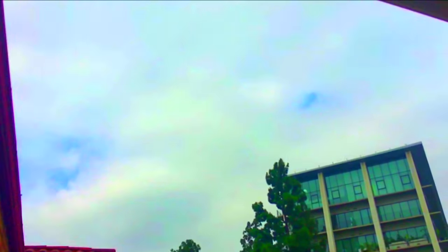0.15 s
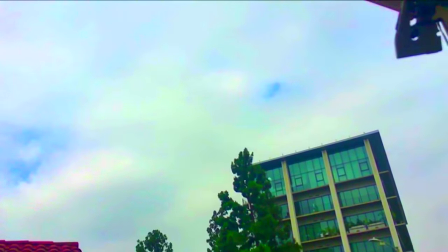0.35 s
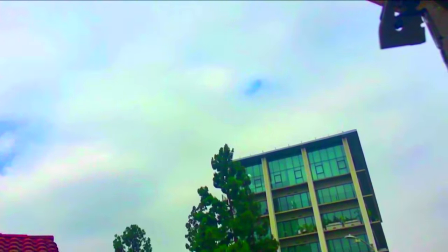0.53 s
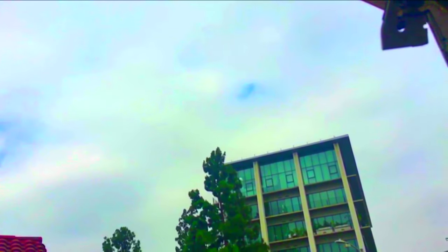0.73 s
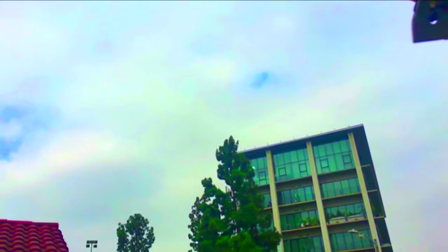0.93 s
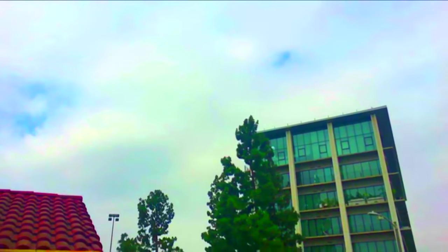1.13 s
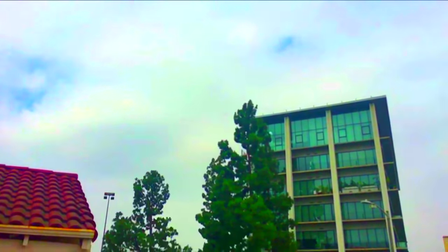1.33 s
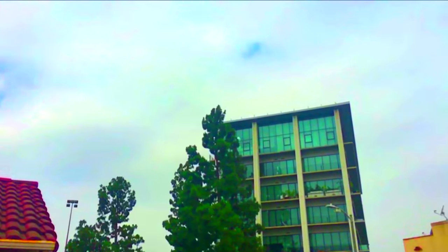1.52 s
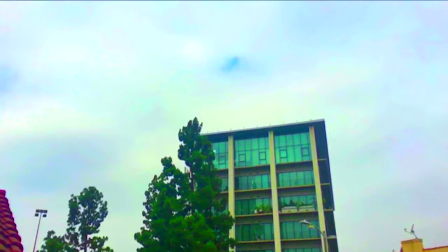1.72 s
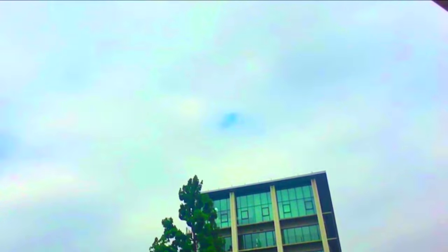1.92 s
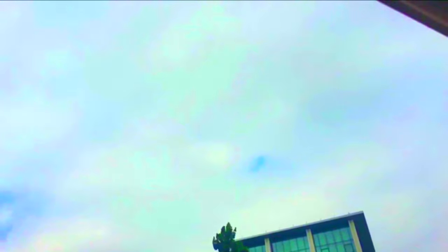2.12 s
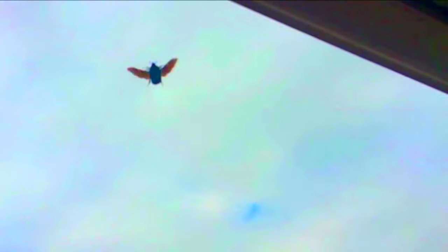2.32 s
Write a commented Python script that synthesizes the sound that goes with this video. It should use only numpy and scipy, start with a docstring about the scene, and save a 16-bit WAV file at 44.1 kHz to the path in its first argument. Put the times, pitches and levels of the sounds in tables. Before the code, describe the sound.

Low, fluttering drone of a big beetle flying closer, with a distant engine and bird behind.

```python
"""A town square fades in: low rumble, and a distant engine droning on one slowly sinking note.
A small click sounds close by at the start. A large beetle flies up to the microphone, each wing
stroke giving a low thrum and a puff of hiss. Behind it a bird whistles two trills, smeared by
wall echoes. The level keeps rising to the end, and the peaks lean on a limiter."""
import sys
import numpy as np
from scipy import signal
from scipy.fft import rfft, irfft
from scipy.io import wavfile
from scipy.ndimage import uniform_filter1d, minimum_filter1d

SR = 44100
rng = np.random.default_rng(int(sys.argv[2]) if len(sys.argv) > 2 else 0)


def transcribe(signal):
    """Save signal, clipped to [-1, 1], as a 16-bit WAV file at the path in sys.argv[1]."""
    frames = np.atleast_2d(signal).T
    limited = np.clip(frames, -1, 1)
    pcm = np.round(limited * 32767).astype(np.int16)
    wavfile.write(sys.argv[1], SR, pcm)


N = 104076


def gain_of(db):
    """Decibels to gain."""
    return 10 ** (np.asarray(db) / 20)


def unit_rms(x):
    """Scales a signal to rms 1."""
    return x / np.sqrt(np.mean(x ** 2) + 1e-20)


def curves(table):
    """Turns a table with time_s first into one per-sample curve for each further column."""
    times, *columns = np.transpose(table)
    return [np.interp(np.arange(N) / SR, times, column) for column in columns]


def equalise(x, eq):
    """Filters by (frequency_hz, gain_db) points joined on a log-frequency axis."""
    points_hz, points_db = np.transpose(eq)
    hz = np.fft.rfftfreq(x.shape[-1], 1 / SR)
    gain_db = np.interp(np.log(hz + 1), np.log(points_hz + 1), points_db)
    return irfft(rfft(x) * gain_of(gain_db), x.shape[-1])


def drift(seconds):
    """Random drift of rms 1 that changes over the given time."""
    size = max(int(seconds * SR), 2)
    return unit_rms(uniform_filter1d(uniform_filter1d(rng.standard_normal(N), size), size))


def wavering_harmonics(phase, harmonics, waver_db, waver_s):
    """Sines at multiples of one phase, each drifting in level on its own."""
    return sum(gain_of(db + waver_db * drift(waver_s)) * np.sin(k * phase + 2 * np.pi * rng.random())
               for k, db in harmonics)


def spread(mid, twin):
    """Left and right from a centre signal and an unrelated twin that widens the upper mids."""
    # tone of the side signal: frequency_hz, gain_db
    side_eq = [(150, -66), (330, -26), (770, -24), (1050, -17), (1500, -3), (2100, 1), (2950, -2),
               (3150, -32), (15000, -24)]
    # the image widening and narrowing: time_s, gain_db
    side_ride = [(.49, -39), (.53, -12.5), (.91, -13), (.94, 3), (1.03, -13.5), (1.42, -8), (1.47, 1),
                 (1.56, 0), (1.7, -5.5), (1.9, -5), (1.96, 6), (2.14, 2), (2.19, -3.5), (2.36, -11.5)]
    side = equalise(twin, side_eq) * gain_of(curves(side_ride)[0])
    return np.array([mid + side, mid - side])


def town_rumble():
    """The town's bed of noise: a swelling deep rumble under a patchy, faintly flickering wash."""
    # tone of the bed: frequency_hz, gain_db
    town_eq = [(20, -40), (35, -3.5), (48, -2.5), (70, 2.5), (98, 3), (125, -16), (200, -14), (300, -20),
               (500, -24.5), (1000, -26), (1800, -31), (2500, -37.5), (3600, -40), (4500, -47),
               (9500, -51.5), (10200, -55), (15700, -55.5)]
    # swell of the deep rumble: time_s, gain_db
    swells = [(0, 1), (.5, 0.5), (.75, 3), (1.0, -3), (1.25, 3), (1.5, -1.5), (1.7, -4), (1.95, 0.4),
              (2.15, -4), (2.36, -1.7)]
    level_db, patch_db, flicker_db, rumble_top_hz = -10.5, 1.5, 0.14, 112
    size, hop = 1024, 256
    frames, hz = N // hop + 5, np.fft.rfftfreq(size, 1 / SR)
    mid_re, mid_im, twin_re, twin_im, patches = rng.standard_normal((frames, len(hz), 5)).T
    patches = unit_rms(uniform_filter1d(uniform_filter1d(patches, 10, axis=0), 12, axis=1))
    flicker = unit_rms(uniform_filter1d(rng.standard_normal(frames), 3)) * (hz > 400)[:, None]
    lows = 1 / (1 + (hz[:, None] / rumble_top_hz) ** 4)
    swell_db = lows * np.interp(np.arange(frames) * hop / SR, *np.transpose(swells))
    spectra = np.array([mid_re + 1j * mid_im, twin_re + 1j * twin_im])
    spectra *= gain_of(patch_db * patches - flicker_db * flicker + swell_db)
    noise = signal.istft(spectra, nperseg=size, noverlap=size - hop)[1][:, :N]
    mid, twin = equalise(noise, town_eq)
    return gain_of(level_db) * spread(mid, twin) / np.std(mid)


def engine_drone():
    """A distant engine: one low, sinking note whose weak overtones waver and die down."""
    # the engine's note: time_s, pitch_hz, level_db
    note = [(0, 118.3, -13), (.55, 117.6, -9), (.95, 115.9, -8.5), (1.3, 116.9, -10), (1.6, 116.4, -10.5),
            (1.9, 116, -7), (2.36, 115.8, -15)]
    # its overtones: multiple, relative_db
    harmonics = [(2, -20.5), (3, -28), (4, -28.5)]
    dulling_db_per_s = 6.5
    pitch_hz, level_db = curves(note)
    phase = 2 * np.pi * np.cumsum(pitch_hz) / SR
    overtones = wavering_harmonics(phase, harmonics, waver_db=-1.5, waver_s=0.036)
    overtones *= gain_of(-dulling_db_per_s * (np.arange(N) / SR - 1))
    return np.sqrt(2) * gain_of(level_db) * (np.sin(phase) + overtones)


def click():
    """One bright tick of noise close to the microphone, among a few faint ones."""
    # tone of the ticks: frequency_hz, gain_db
    tick_eq = [(470, -35.5), (800, 6), (1770, -12), (2470, 9.5), (5450, -11.5), (11000, 1.5), (15400, -3)]
    # the ticks: peak_s, level_db
    ticks = [(.101, -34), (.113, -25), (0.1247, 1.5), (.138, -15)]
    rise_s, fall_s = 0.00093, 0.00076
    t = np.arange(N) / SR
    noise = unit_rms(equalise(rng.standard_normal(N), [(200, -14)] + tick_eq))
    return noise * sum(gain_of(db) * np.exp(-abs(t - peak_s) / np.where(t < peak_s, rise_s, fall_s))
                       for peak_s, db in ticks)


def beetle_wings():
    """Wing strokes: a thrum on harmonics of the stroke rate, and hiss that puffs at each reversal."""
    # the flight: time_s, stroke_hz, hiss_db, puff_share (0-1 of the hiss),
    # upstroke (0-1 of the downstroke puff), thrum_db
    flight = [(.5, 88.23, -57, 0.1, .5, -47), (1.15, 88.53, -54, 0.5, 0.7, -27.5),
              (1.27, 87.4, -43, 0.5, .3, -27.5), (1.34, 89.67, -32, 0.44, 0.2, -25),
              (1.43, 87.84, -36, 0.3, .6, -32), (1.55, 86.3, -37, 0.4, .9, -40),
              (1.63, 90.11, -29.5, 0.46, 0.8, -25), (1.7, 94.57, -23, 0.47, 0.6, -29.5),
              (1.77, 93.4, -27.5, 0.53, 0.8, -26), (1.83, 91.87, -29, 0.35, 0.2, -26.5),
              (1.88, 89.73, -26.5, .7, 0, -25), (1.98, 85.88, -27, 0.5, 0.29, -23.5),
              (2.06, 84.6, -27, 0.58, 0.2, -26), (2.14, 83.7, -29.5, 0.38, 0.8, -23),
              (2.2, 89.66, -26.5, 0.6, .7, -23.5), (2.27, 92, -31.5, 0.17, .5, -26.5),
              (2.36, 92.95, -23, .8, 0.3, -25)]
    # harmonics of the thrum: multiple, relative_db
    harmonics = [(1, -4), (2, 3), (3, -7), (4, -4), (5, -11), (6, -14), (7, -15), (8, -15), (9, -17),
                 (10, -17), (11, -14), (12, -14), (13, -15), (14, -17)]
    # tone of the wing hiss: frequency_hz, gain_db
    air_eq = [(2240, 5), (3800, 1.5), (4770, -1.5), (5790, 3), (7630, 0), (8880, 4.5), (9990, -2),
              (11700, 1), (15400, 1)]
    stroke_jitter, puff_sharpness, puff_uneven_db = 0.005, 4.5, 1.5
    stroke_hz, hiss_db, puff_share, upstroke, thrum_db = curves(flight)
    phase = 2 * np.pi * np.cumsum(stroke_hz * (1 + stroke_jitter * drift(0.0237))) / SR
    thrum = wavering_harmonics(phase, harmonics, waver_db=2.0, waver_s=0.041)
    down_puffs = np.exp(puff_sharpness * (np.cos(phase) - 1))
    up_puffs = np.exp(puff_sharpness * (-np.cos(phase) - 1))
    puffs = down_puffs + upstroke * up_puffs
    puffs /= np.sqrt(uniform_filter1d(puffs ** 2, 1000))  # unit power over about two strokes
    puffs *= gain_of(puff_uneven_db * drift(0.005))
    air = unit_rms(equalise(rng.standard_normal(N), [(200, -40), (900, -23)] + air_eq))
    hiss = air * np.sqrt(1 - puff_share + puff_share * puffs ** 2)
    return np.sqrt(2) * gain_of(thrum_db) * thrum + gain_of(hiss_db) * hiss


def bird_trills():
    """A whistle that scoops up to its top note and dips from it many times a second, with echoes."""
    # trill segments, the first three run together: start_s, length_s, level_db, top_hz, drop_hz, rate_hz
    segments = [(.93, .6, -27, 3360, 800, 47), (1.556, .014, -28, 2800, 700, 70),
                (1.56, .07, -35, 3360, 500, 47), (1.972, .12, -28, 2980, 330, 45)]
    # the bird's effort: time_s, gain_db
    effort = [(.93, 3), (1.03, 3), (1.13, -3.5), (1.23, 0.3), (1.3, -3), (1.37, 6), (1.41, -2),
              (1.46, -2.7), (1.55, -3.5), (1.9, 4), (2.02, 6), (2.14, -7)]
    trim_db, direct_db, dip_db, uneven_db = -3.5, -2, -4.5, 1.5
    top_wander, drop_wander, rasp = 0.007, 0.2, 0.35
    t, song = np.arange(N) / SR, np.zeros(N)
    for start_s, length_s, level_db, top_hz, drop_hz, rate_hz in segments:
        rise_s, fall_s = min(0.035, length_s / 3), min(0.045, length_s)
        rise = np.clip((t - start_s) / rise_s, 0, 1)
        fall = np.clip((start_s + length_s + fall_s - t) / fall_s, 0, 1)
        dip = ((t - start_s) * rate_hz) % 1  # runs from 0 to 1 through each note
        pitch_hz = top_hz * (1 + top_wander * drift(0.04))
        pitch_hz -= drop_hz * (1 + drop_wander * drift(0.01507)) * dip ** 2
        pitch_hz -= drop_hz * (1 - rise) ** 2  # the opening scoop
        loudness = gain_of(level_db + dip_db * dip + uneven_db * drift(0.06))
        loudness *= 1 + rasp * drift(0.0044)
        song += 2 * rise * fall * loudness * np.sin(2 * np.pi * np.cumsum(pitch_hz) / SR)
    song *= gain_of(curves(effort)[0])
    mid_echo, side_echo = wall_echoes(song)
    return gain_of(trim_db) * spread(gain_of(direct_db) * song + mid_echo, side_echo)


def wall_echoes(x):
    """Two unrelated echo tails; the paths shift slowly, so no two notes are smeared alike."""
    t60_s, shift_s = 0.2, 0.12
    t, wet = np.arange(N) / SR, np.zeros((2, N))
    for path in range(3):
        tails = rng.standard_normal((2, SR // 2)) * gain_of(-60 * t[:SR // 2] / t60_s)
        tails /= np.linalg.norm(tails[0])
        crossfade = np.sqrt(2 / 3) * np.cos(np.pi * (t / shift_s + path) / 3)
        wet += signal.fftconvolve((x * crossfade)[None], tails, axes=1)[:, :N]
    return wet


def limiter(x):
    """Ducks just ahead of each peak by most of its overshoot, then recovers steadily."""
    threshold_db, strength, recover_db_per_s, window = -1, 0.9, 23, 129
    peak_db = 20 * np.log10(abs(x).max(0) + 1e-9)
    ahead_db = -minimum_filter1d(-peak_db, window)
    recovery_db = recover_db_per_s * np.arange(N) / SR
    held_db = np.maximum.accumulate(ahead_db + recovery_db) - recovery_db
    over_db = np.maximum(held_db - threshold_db, 0)
    return x / gain_of(strength * uniform_filter1d(over_db, window))


def scene():
    """Town and bird spread in stereo; engine, beetle and click sit in the centre."""
    return town_rumble() + engine_drone() + beetle_wings() + bird_trills() + click()


def record(dry):
    """Opens after a silence and fades up over settling microphone hiss; limits, clips and low-passes."""
    # the rising master fader: time_s, gain_db
    fader = [(.084, -18.5), (.16, -16), (.34, -10), (.54, -3.5), (.7, 0), (2.36, 13.5)]
    open_s, settle_s, floor_db, opening_db, lowpass_hz = 0.0838, 0.18, -70, -47, 15775
    t = np.arange(N) / SR
    settling = np.exp(-abs(t - open_s) / settle_s)
    hiss = (gain_of(floor_db) + gain_of(opening_db) * settling) * rng.standard_normal(N)
    gate = np.clip((t - open_s) / 0.0007, 0, 1)
    faded = gate * (dry * gain_of(curves(fader)[0]) + hiss)
    clipped = np.clip(limiter(faded), -1, 1)
    lowpass = signal.firwin(1023, lowpass_hz, window=("kaiser", 9), fs=SR)
    return signal.oaconvolve(clipped, lowpass[None], "same")


dry = scene()
out = record(dry)
transcribe(out)
```